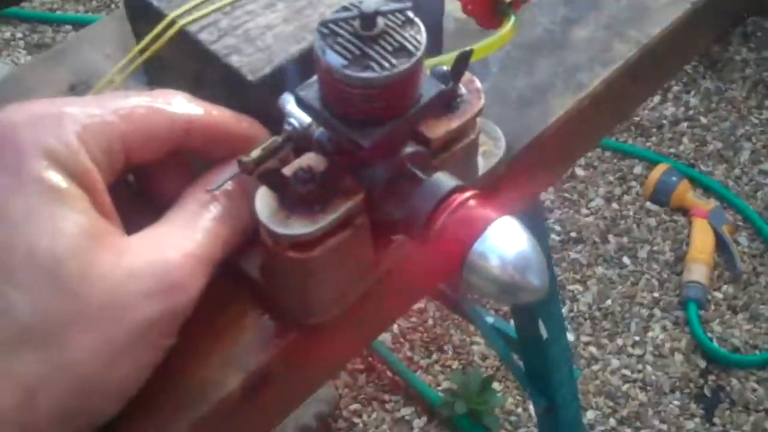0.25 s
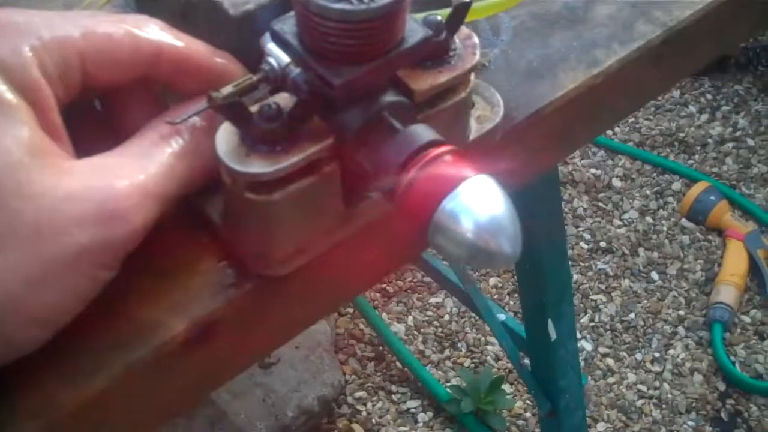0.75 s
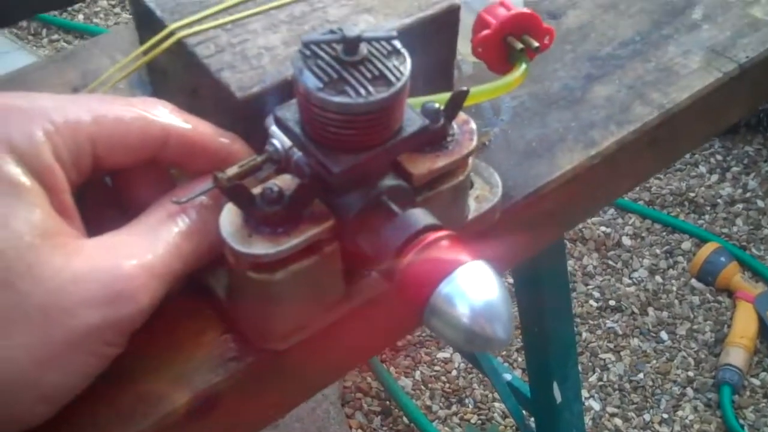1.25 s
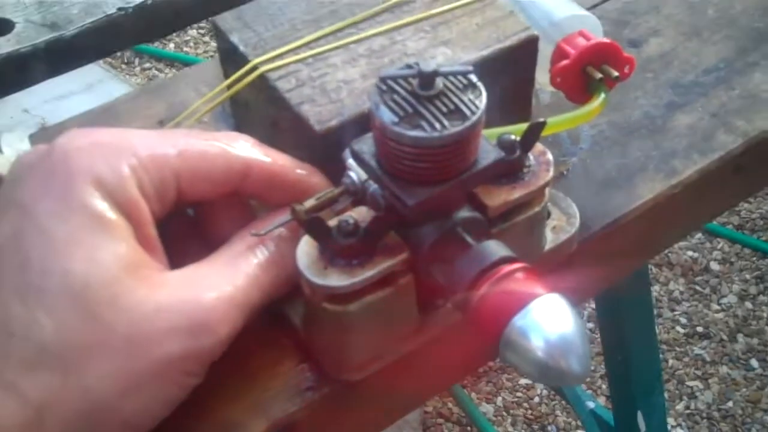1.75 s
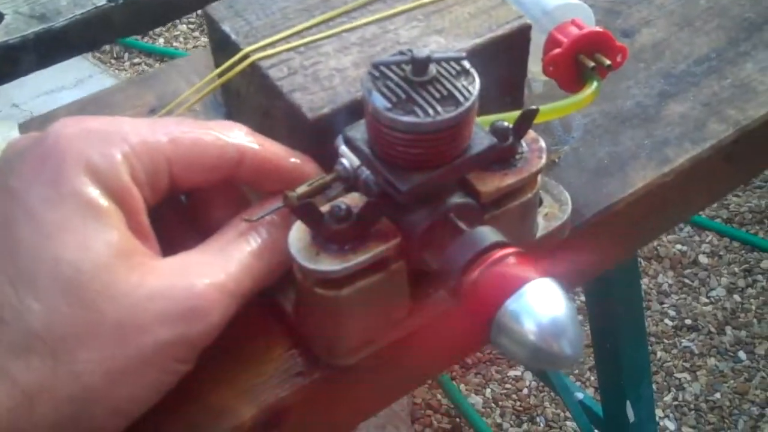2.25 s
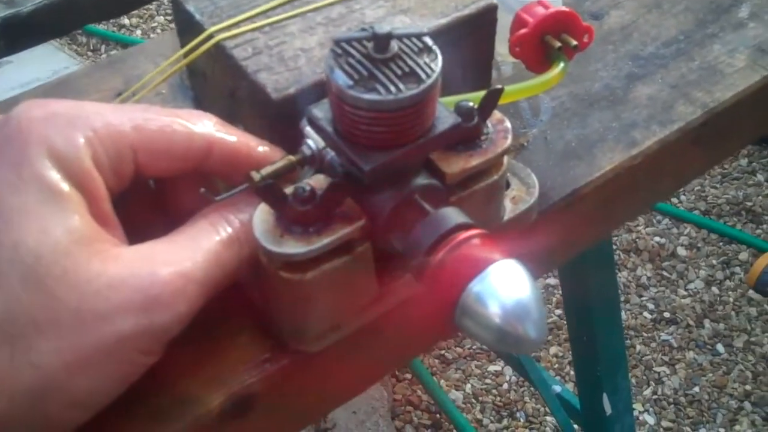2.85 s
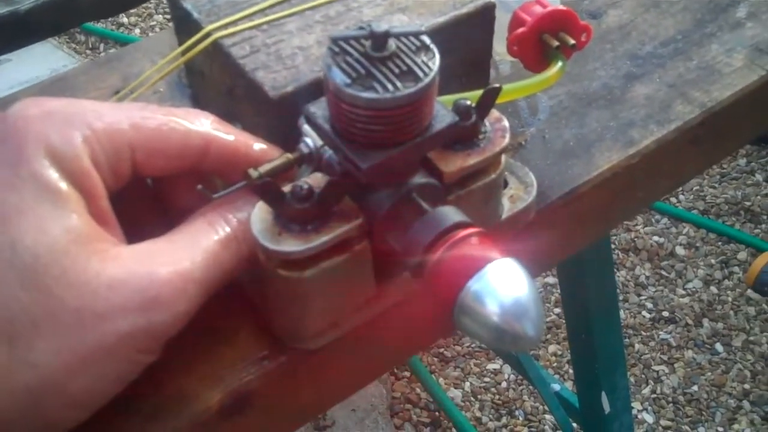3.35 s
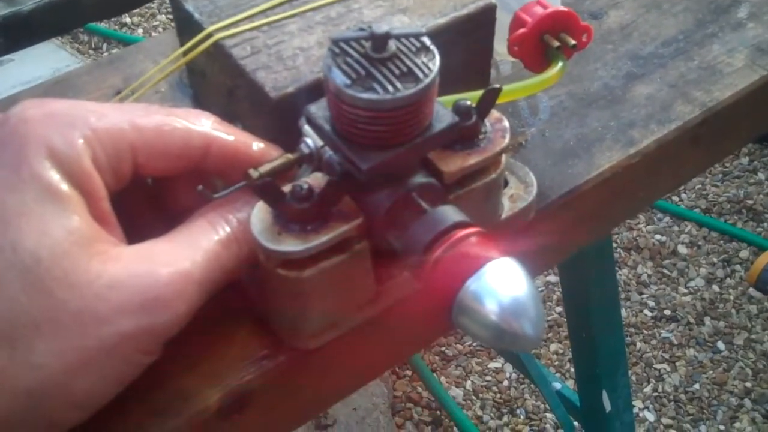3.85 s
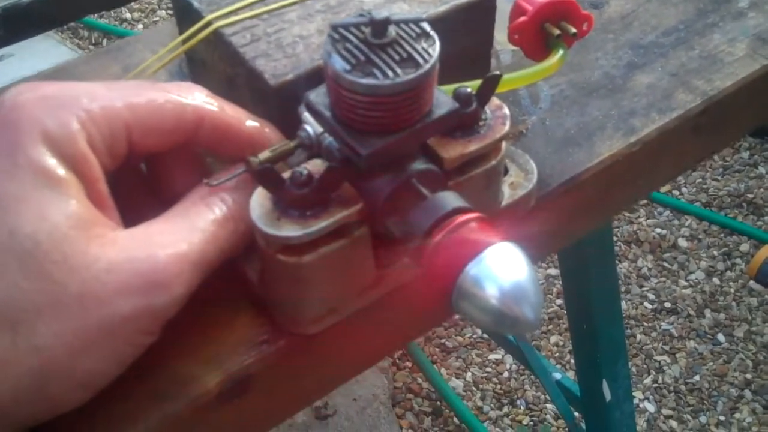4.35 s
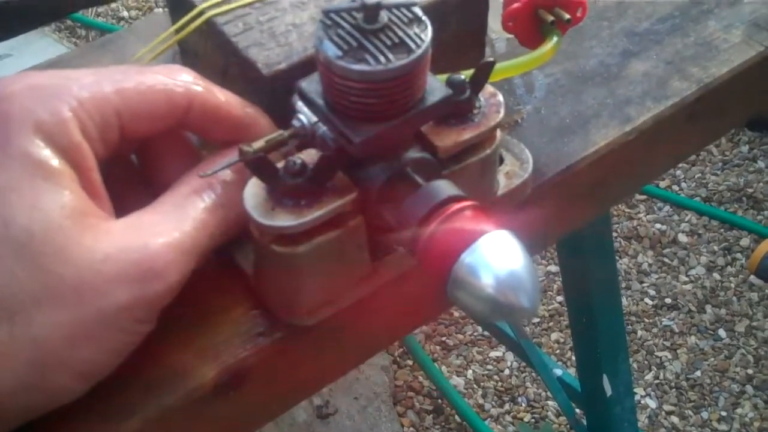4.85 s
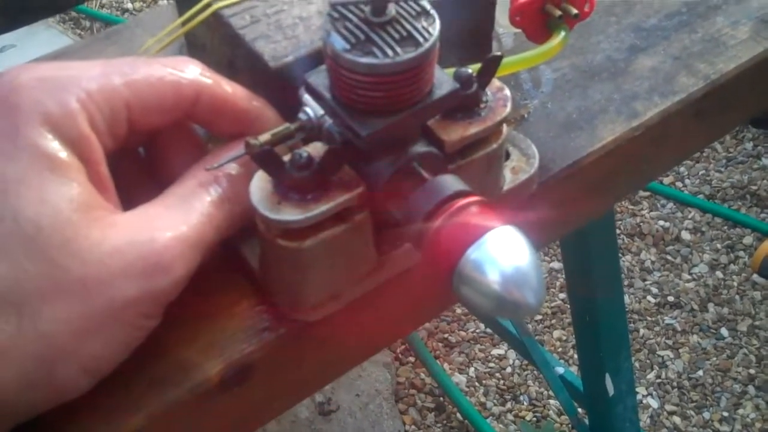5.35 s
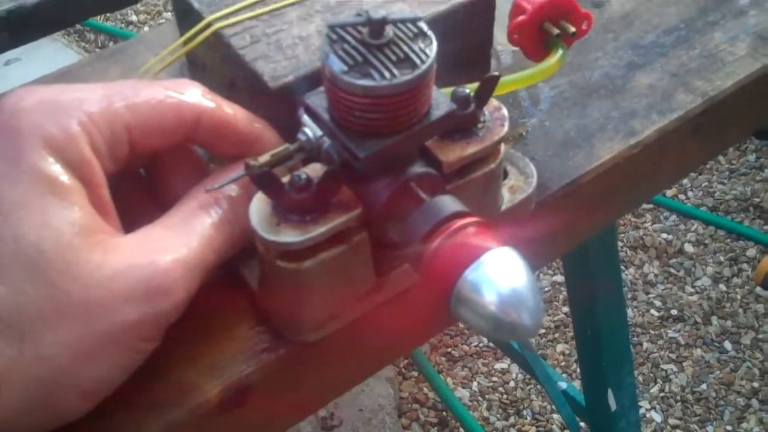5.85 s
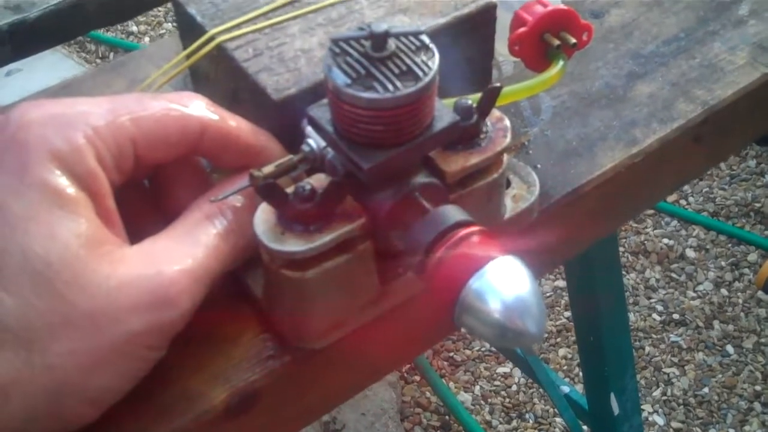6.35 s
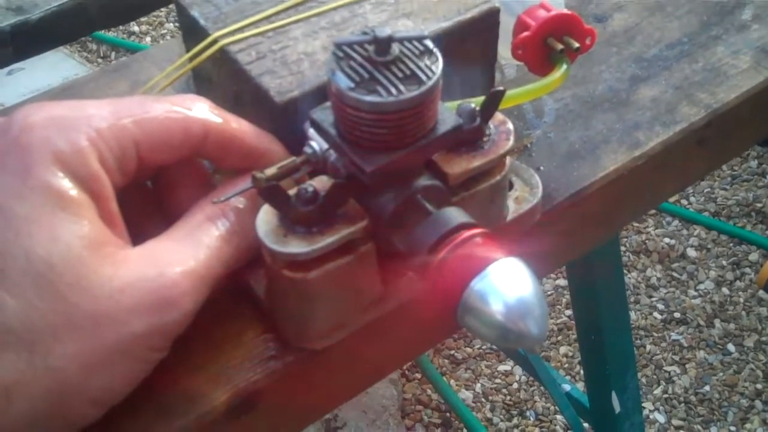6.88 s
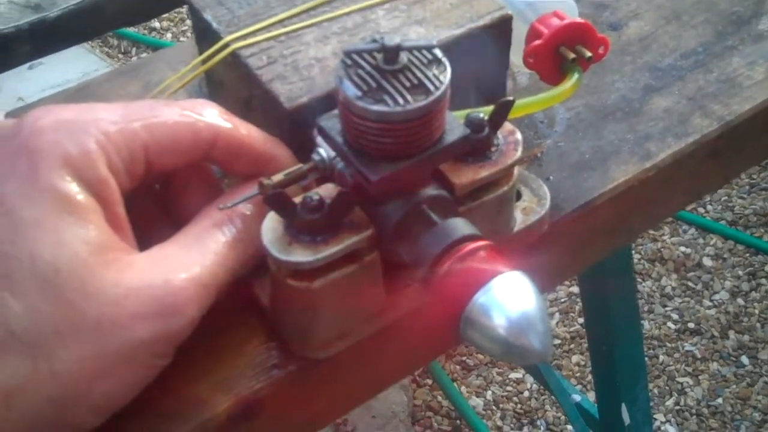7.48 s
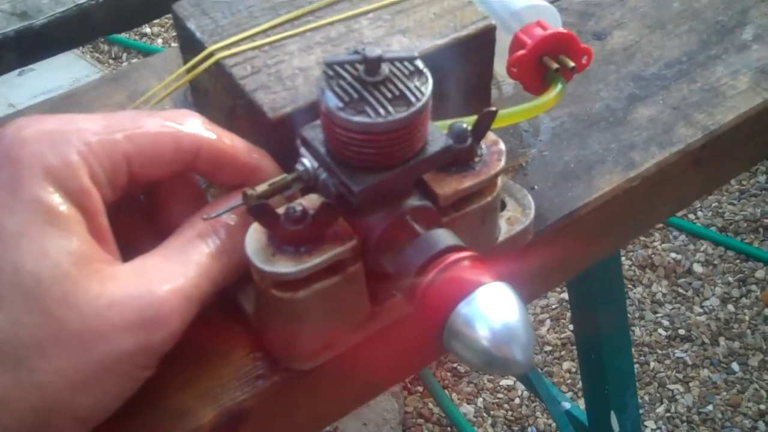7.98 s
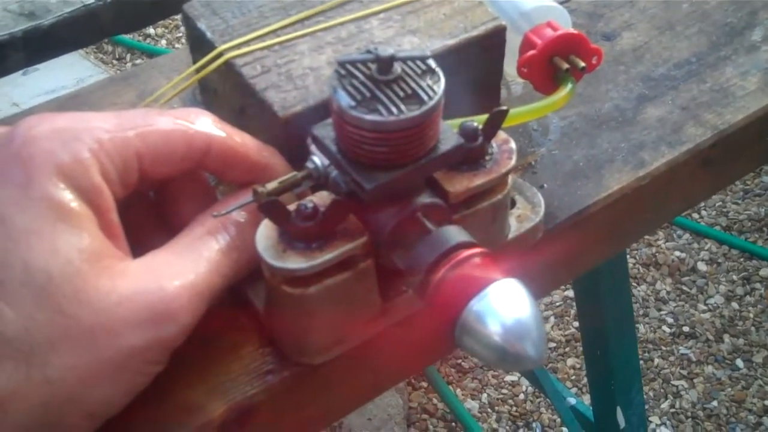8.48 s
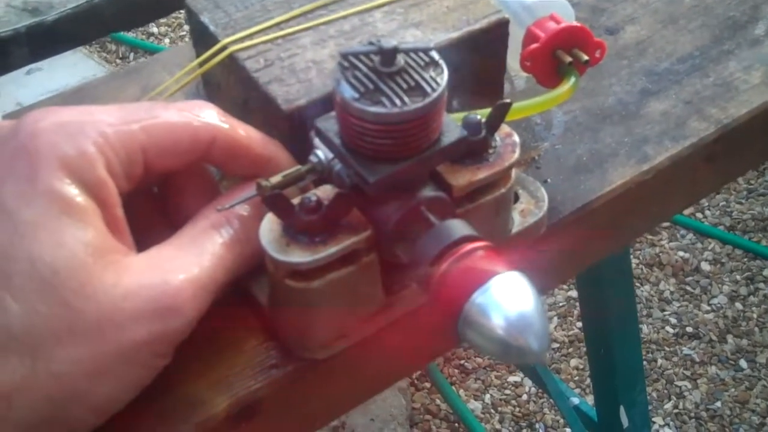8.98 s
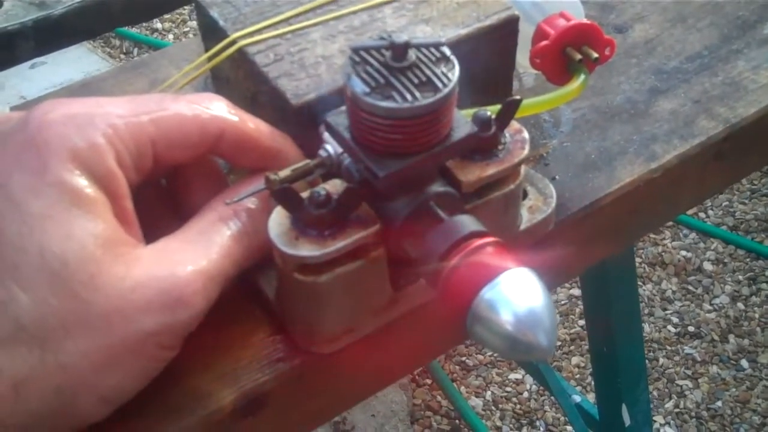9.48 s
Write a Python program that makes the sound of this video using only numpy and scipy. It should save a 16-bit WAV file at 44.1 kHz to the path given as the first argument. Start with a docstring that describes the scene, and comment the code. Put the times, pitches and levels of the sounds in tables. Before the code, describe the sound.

A tiny two-stroke engine spinning a propeller runs very close to a hand-held microphone in a garden. Its hard, raspy buzz climbs over several seconds, with metallic ringing, hiss and blade hum. Near the middle it stops firing and drops in pitch, catches three times with clanking pops, then runs on slower, with brief hiccups and low thumps of blown air on the microphone.

```python
"""On a garden bench a small two-stroke model diesel swings a propeller close to a hand-held microphone.
As the needle is turned it speeds up, stops firing and slows sharply, catches three times and runs on slower.
Each turn the exhaust port barks, made of short shaped pulses, and knocks ring the metal.
Shaped noise makes the gas hiss, sine waves make the blades hum, and deep thumps buffet the microphone."""
import sys
import numpy as np
from scipy import signal
from scipy.fft import rfft, irfft
from scipy.io import wavfile
from scipy.ndimage import uniform_filter1d, minimum_filter1d

SR = 44100
rng = np.random.default_rng(int(sys.argv[2]) if len(sys.argv) > 2 else 0)


def digitize_waveform(pressure):
    """Quantize a signal to 16-bit integers and store it at the path in sys.argv[1].

    Rows of a 2-D input are taken as channels; values are limited to [-1, 1].
    """
    field = np.atleast_2d(pressure).T
    bounded = np.clip(field, -1, 1)
    quanta = np.round(bounded * 32767).astype(np.int16)
    wavfile.write(sys.argv[1], SR, quanta)


N = 428652
TIME = np.arange(N) / SR
FRAME = 1024  # samples in one pulse
BINS_HZ = np.arange(FRAME // 2 + 1) * SR / FRAME
REFERENCE_HZ = 100  # shaft speed at which the speed laws are stated, turns per second


def undb(db):
    """Decibels to gain."""
    return 10 ** (np.asarray(db) / 20)


def curves(table, at):
    """Every column of a time table, read at the given times."""
    s, *columns = np.transpose(table)
    return [np.interp(at, s, c) for c in columns]


def spectra(table, hz):
    """Every column of a spectrum table, read on a log-frequency axis."""
    points, *columns = np.transpose(table)
    return [np.interp(np.log(hz + 1), np.log(points), c) for c in columns]


def bump(centre_hz, width_hz):
    """A bell shape on the frequency axis."""
    return np.exp(-((BINS_HZ - centre_hz) / width_hz) ** 2)


def by_speed(law, hz):
    """Level in dB at a given shaft speed; a law is (dB at the reference speed, dB per doubling of speed)."""
    db, db_per_doubling = law
    return db + db_per_doubling * np.log2(hz / REFERENCE_HZ)


def noise(table):
    """Steady noise with a given spectrum."""
    hz = np.arange(N // 2 + 1) * SR / N
    return irfft(rfft(rng.standard_normal(N)) * undb(spectra(table, hz)[0]), N)


def wander(count, size=12):
    """A random value for each step that drifts over several steps; spread near 1."""
    return np.sqrt(size) * uniform_filter1d(rng.standard_normal(count), size)


def scatter(times, spread_db):
    """A smooth random colouring for each turn."""
    chance = rng.standard_normal((len(times), len(BINS_HZ)))
    smooth = uniform_filter1d(uniform_filter1d(chance, size=15, axis=1), size=15, axis=1)
    return spread_db * smooth / smooth.std()


SWEEP_HZ = 1970  # in a swept pulse the sound below this arrives late
SMEAR_HZ = 4290  # in a smeared pulse the sound above this trails behind


def pulses(times, sizes, colour_db, abrupt=1, sweep_s=0, smear_s=0):
    """A pulse at each time with a shared or own spectrum; abrupt 1 strikes at once, 0 swells and fades evenly."""
    lead = FRAME // 8  # samples of room for a swell before the given time
    log_gain = np.log(undb(colour_db))
    # folding the cepstrum gives the phase of a pulse that strikes at once
    fold = 1 + np.sign(FRAME // 2 - np.arange(FRAME))
    phase = rfft(irfft(log_gain) * fold).imag * min(abrupt, 1)
    # sweep: the treble leads and the lows follow
    phase = phase - 2 * np.pi * sweep_s * SWEEP_HZ * np.arctan(BINS_HZ / SWEEP_HZ)
    # smear: the highest treble comes last
    phase = phase - np.pi * smear_s * np.maximum(BINS_HZ - SMEAR_HZ, 0) ** 2 / SMEAR_HZ
    start, late = np.divmod(np.clip(times * SR, 0, N), 1)
    phase = phase - 2 * np.pi * BINS_HZ * (lead + late[:, None]) / SR
    shapes = sizes[:, None] * irfft(np.exp(log_gain + 1j * phase))
    places = start.astype(int)[:, None] + np.arange(FRAME)
    return np.bincount(places.ravel(), shapes.ravel(), N + lead)[lead:N + lead]


# spells of poor firing: from t/s, to t/s, share of the charge burnt (0-1)
MISSES = [(0.736, 0.748, 0.2), (5.015, 5.221, 0.0), (5.415, 5.519, 0.0), (5.519, 5.53, 0.55),
          (5.615, 5.706, 0.0), (6.024, 6.07, 0.16), (6.11, 6.139, 0.16), (6.465, 6.489, 0.38),
          (6.796, 6.819, 0.4), (6.99, 7.02, 0.36), (7.06, 7.072, 0.25), (7.364, 7.41, 0.67),
          (7.811, 7.834, 0.42), (8.226, 8.238, 0.37), (8.693, 8.727, 0.38), (8.865, 8.888, 0.5),
          (9.005, 9.017, 0.12), (9.092, 9.104, 0.06), (9.494, 9.517, 0.43), (9.69, 9.72, 0.22)]


def firing(times):
    """Share of the charge that burns at each time, and how long the engine has been missing."""
    burn, missing_s = np.ones(len(times)), np.zeros(len(times))
    for start, end, share in MISSES:
        inside = (times >= start) & (times < end)
        burn[inside], missing_s[inside] = share, times[inside] - start
    return burn, missing_s


# speed that the needle setting would hold if every turn fired: t/s, turns per second f/Hz
NEEDLE_SPEED = [(0.0, 96.53), (0.17, 97.09), (0.63, 104.23), (0.92, 103.07), (1.88, 114.49), (2.08, 110.21),
                (2.52, 118.27), (2.93, 119.34), (3.42, 129.95), (4.42, 130.55), (4.87, 116.34),
                (5.23, 99.38), (6.16, 95.33), (6.2, 90.43), (7.22, 87.51), (8.44, 92.51), (8.53, 97.26),
                (9.72, 90.95)]


def shaft_speed(inertia_s=.164, misfire_drag=.37):
    """The shaft lags behind the needle, coasts down on every misfire and picks up when it fires again."""
    # an unburnt charge takes its share off the speed that the shaft heads for
    aim = curves(NEEDLE_SPEED, TIME)[0] * (1 - misfire_drag * (1 - firing(TIME)[0]))
    keep = np.exp(-1 / (inertia_s * SR))
    return aim[0] + signal.lfilter([1 - keep], [1, -keep], aim - aim[0])


def combustion(times, linger=0.85, flare_db=7):
    """Burn, time spent missing and flare of each turn: fuel left unburnt makes the next firings louder."""
    burn, missing_s = firing(times)
    linger = min(linger, .95)
    unburnt = signal.lfilter([0, 1 - linger], [1, -linger], 1 - burn)
    return burn, missing_s, flare_db * unburnt ** 2 * (burn == 1)


BLADE_LAW = (-26.5, 8.8)
THROB_LAW = (-54, 48)  # unequal blades throb once a turn near full speed
# octave above the blade hum, weaker at high speed: turns per second f/Hz, level relative to the hum/dB
HUM_OCTAVE = [(85, -9.5), (100, -9.5), (113, -15.5), (122, -21), (130, -19)]


def propeller(turns, speed, third_db=-20, angle=0.12, second_angle=0.088):
    """Two blades push the air twice a turn: a round hum with two overtones, over a faint once-a-turn throb."""
    blade = 4 * np.pi * (turns - angle)
    octave = undb(curves(HUM_OCTAVE, speed)[0]) * np.sin(2 * (blade + 2 * np.pi * second_angle))
    third = undb(third_db) * np.sin(3 * blade)
    hum = undb(by_speed(BLADE_LAW, speed)) * (octave + third - np.cos(blade))
    throb = undb(by_speed(THROB_LAW, speed)) * np.sin(blade / 2)
    return np.sqrt(2) * (hum + throb)


HISS_LAW = (9.34, -0.15)
# colour of the rush of gas and air: f/Hz, relative level/dB
RUSH_COLOUR = [(60, -18.5), (300, -29), (800, -33), (1400, -29.5), (2400, -24.5), (4100, -31.5),
               (5200, -27.5), (7400, -28.5), (9000, -38), (11500, -48.5), (14500, -52)]


def hiss(turns, level_db, burn, suck=0.74, intake_at=0.43, intake_turns=0.039, idle=0.33, alike_hz=3500):
    """Gas rushes out after each bark and is drawn in later in the turn, over the steady wash of the blades."""
    hz = np.arange(N // 2 + 1) * SR / N
    colour = undb(spectra(RUSH_COLOUR, hz)[0])
    # the two sides are more alike in the lows
    apart = np.clip(hz / alike_hz, .4, 1)
    mid, side = (irfft(rfft(rng.standard_normal(N)) * colour * g, N) for g in (1, apart))
    angle = turns % 1
    jet = burn * np.exp(-angle / .2)  # fades over a fifth of a turn
    draw = suck * np.exp(-((angle - intake_at) / intake_turns) ** 2)
    return np.array([mid + side, mid - side]) * (idle + jet + draw) * undb(level_db) / np.sqrt(2)


WHISTLE_LAW = (-0.86, -2.9)
EARLY_WHISTLE_DB, EARLY_WHISTLE_S = 7, 0.67  # at first the whistle is louder: extra level, fade
# whistles as the piston uncovers the intake: f/Hz, width f/Hz, relative level/dB, fade t/s
INTAKE_WHISTLES = [(6340, 550, -29.5, 0.0012), (7430, 710, -32, 0.0033)]


def intake(turns, speed, opens=.42, attack_s=0.00041, rise_s=0.00049, bend=0.27, rough=1.0):
    """The whistle bends up as the port opens, then fades within the turn: part pure tone, part turbulence."""
    angle = (turns - opens) % 1
    age = angle / speed
    out = np.zeros((2, N))
    for hz, width_hz, db, fade_s in INTAKE_WHISTLES:
        keep = np.exp(-np.pi * width_hz / SR)
        chance = rng.standard_normal((2, N)) + 1j * rng.standard_normal((2, N))
        flutter = signal.lfilter([np.sqrt((1 - keep ** 2) / 2)], [1, -keep], chance)
        cycles = hz * (age - bend * rise_s * (1 - np.exp(-age / rise_s)))
        envelope = undb(db) * (1 - np.exp(-age / attack_s)) * np.exp(-age / fade_s) * (1 - angle ** 2)
        out += envelope * ((1 + rough * flutter) * np.exp(2j * np.pi * cycles)).imag
    early_db = EARLY_WHISTLE_DB * np.exp(-TIME / EARLY_WHISTLE_S)
    return undb(by_speed(WHISTLE_LAW, speed) + early_db) * out


BARK_LAW = (0.037, 1.6)
SWELL_DB_PER_S = 9  # while it misses, the cylinder loads up with fuel and the dull puffs swell
# in the first turns of a rich miss the charge burns late and rings the hot port
LATE_HZ, LATE_WIDTH_HZ, LATE_DB, LATE_SHARE, COOLING_S = 2900, 280, 12, 0.11, 0.024
# the transfer port's second puff ripples the spectrum: share of a turn later, depth of the ripple
TRANSFER_TURNS, TRANSFER_DB = 0.127, 2
# the needle takes the mixture from lean to rich: t/s, richness (0-1)
RICHNESS = [(5.0, 0), (5.2, 1)]
# colour of a fired bark: f/Hz, relative level when rich/dB, when lean/dB, when lean at full speed/dB
BARK_COLOUR = [(86, -9.5, -19, -20), (408, 6.5, 13, 18.5), (693.6, 9.5, 7, 6.5), (1099, 15.5, 14, 11),
               (1340, 10.5, 14, 0.5), (1610, 12.5, 16, 12.5), (1946, 13.5, 8.5, 5.5),
               (2407, 19.5, 21, 18.5), (3070, 9.5, 6.5, 9), (3290, 3.5, 3.5, 10), (4264, 2, 2, 5),
               (4760, 8.5, 6.5, -5), (5200, -1, 0, 8), (5700, 6.5, 2.5, 5.5), (7160, -2.5, 2.5, -17),
               (9500, -12.5, -10.5, -8), (14500, -15, -13, -12)]
# gaps and humps in the bark: multiple of shaft speed when lean, when rich, width f/Hz,
# gain when lean level/dB, gain when rich level/dB
BARK_GAPS = [(14.5, 15.4, 204, -21, -15.5), (7.9, 1.86, 290, -1, 8), (20.6, 19, 280, 1, -3.5)]
# colour of the dull puff of an unfired turn: f/Hz, relative level/dB
PUFF_COLOUR = [(87, 1.5), (400, 11.5), (650, 8), (880, 0.5), (1120, 3.5), (1600, -1.5), (1950, -2.5),
               (2450, 12), (2950, 3.5), (3500, -11), (4600, -7), (7500, -5), (14500, -39)]


def exhaust(times, hz, burn, missing_s, flare_db, slow_hz=110, fast_hz=128, treble_db=2,
            flare_share=0.71, lag_s=.00002):
    """The port opens once a turn: a short bark, recoloured by speed and mixture, or a dull puff if unburnt."""
    lean_spread_db, rich_spread_db = .3, .4
    richness = curves(RICHNESS, times)[0][:, None]
    rich, lean, fast = spectra(BARK_COLOUR, BINS_HZ)
    pace = np.clip((hz - slow_hz) / (fast_hz - slow_hz), 0, 1)[:, None]
    fired = richness * rich + (1 - richness) * (lean + pace * (fast - lean))
    # the blow-down lasts a fixed crank angle, so its spectral gaps rise with speed
    for lean_order, rich_order, width_hz, lean_db, rich_db in BARK_GAPS:
        centre_hz = hz[:, None] * (lean_order + richness * (rich_order - lean_order))
        fired = fired + (lean_db + richness * (rich_db - lean_db)) * bump(centre_hz, width_hz)
    late = richness * np.exp(-missing_s[:, None] / COOLING_S)
    unfired = spectra(PUFF_COLOUR, BINS_HZ)[0] + SWELL_DB_PER_S * missing_s[:, None]
    unfired = unfired + LATE_DB * late * bump(LATE_HZ, LATE_WIDTH_HZ)
    unfired = unfired + TRANSFER_DB * np.cos(2 * np.pi * TRANSFER_TURNS * BINS_HZ / hz[:, None])
    burnt = burn[:, None] + (1 - burn[:, None]) * LATE_SHARE * late
    spread_db = lean_spread_db + richness * (rich_spread_db - lean_spread_db)
    bark = unfired + burnt * (fired - unfired) + scatter(times, spread_db)
    uneven_db = spread_db[:, 0] * rng.standard_normal(len(times))
    sizes = undb(by_speed(BARK_LAW, hz) + flare_share * flare_db + uneven_db)
    # the jet throws its treble differently to each side
    treble = np.clip(BINS_HZ / 4500, 0, 1) ** 2
    sides = []
    for lag in (lag_s, 0):
        colour_db = bark + treble * scatter(times, treble_db)
        # sweep: the port hisses as it cracks open, before the bulk of the gas gets out
        sides.append(pulses(times + lag, sizes, colour_db, abrupt=0.71, sweep_s=.00095, smear_s=.00055))
    return np.array(sides)


# modes of the engine mount and bench: f/Hz, sharpness Q, level/dB
MOUNT_MODES = [(607, 5, -6), (794, 6.7, -13), (1005, 11.8, -2.5), (1906, 35, -5)]


def mount(x):
    """The barks shake the mount, whose few modes ring on into the gaps between firings."""
    return sum(undb(db) * signal.lfilter(*signal.iirpeak(hz, q, fs=SR), x) for hz, q, db in MOUNT_MODES)


BUFFET_WANDER_DB = 2  # the blast veers on and off the microphone
# how squarely the blast meets the microphone: t/s, relative level/dB
BLAST_AIM = [(0, -4), (1.2, -1.5), (2.3, 1), (3.3, -1), (4.3, 2.5), (5.3, -1), (6.4, -2.5), (7.7, -5.5),
             (9.7, -3)]
# colour of the blast's eddies on one microphone port: f/Hz, relative level/dB
EDDY_COLOUR = [(10, 21), (35, 22.5), (80, 17.5), (160, 12.5), (350, 6.5), (900, -18), (3000, -9),
               (9000, -39)]
# colour of the steady shove of each blast: f/Hz, relative level/dB
PUSH_COLOUR = [(20, 31), (110, 13), (400, 14.5), (900, -0.5), (1600, 9.5), (4000, -55), (12000, -33)]
# strongest gusts on the microphone: t/s, relative level/dB
STRONG_GUSTS = [(0.318, 0), (0.469, -6), (0.141, -13), (2.15, -5), (4.32, -7), (5.2395, -1.5), (5.564, -3),
                (5.724, -5), (5.963, -5), (6.078, -6.5), (6.399, -8), (6.455, -5), (6.499, -2.5),
                (7.039, -4), (7.837, -8), (8.9, -8), (8.967, -12), (9.124, -10), (9.28, -10), (9.409, -9),
                (9.535, -7)]
# colour of the thump of one gust: f/Hz, relative level/dB
GUST_COLOUR = [(10, 16.5), (40, 20), (80, 8.5), (160, 11.5), (350, -2.5), (900, -38), (3000, -53),
               (9000, -60)]


def buffeting(times, force, gusty_db=3.4, travel_s=0.0012, push_db=0, eddy_db=-2, gust_db=21):
    """Each blast pushes the two microphone ports opposite ways, then its eddies thump each port alone."""
    level_db = curves(BLAST_AIM, times)[0] + BUFFET_WANDER_DB * wander(len(times))
    shove = force * undb(push_db + level_db)
    push = pulses(times + travel_s / 2, shove, spectra(PUSH_COLOUR, BINS_HZ)[0], abrupt=0.99)
    left, right, gusty = rng.standard_normal((len(times), 3)).T
    eddy = force * undb(level_db + eddy_db + gusty_db * gusty)
    eddy_colour_db = spectra(EDDY_COLOUR, BINS_HZ)[0]
    eddies = [pulses(times + travel_s, eddy * chance, eddy_colour_db) for chance in (left, right)]
    at, peak_db = np.transpose(STRONG_GUSTS)
    gusts = pulses(at, undb(peak_db + gust_db), spectra(GUST_COLOUR, BINS_HZ)[0])
    return np.array(eddies) + np.array([gusts / 2 - push, gusts + push])


RING_LAW = (-4.7, 21.4)
UNFIRED_KNOCK_DB = -4  # the piston knocks more softly when nothing burns
# at first a thin, bright ring rides on the knocks; its pitch is a multiple of the shaft speed
SHRILL_ORDER, SHRILL_WIDTH_HZ, SHRILL_DB, SHRILL_FADE_S = 64.5, 520, 11.5, 1.2
# ring of the cylinder and its fins: f/Hz, width f/Hz, relative level/dB
FIN_RINGS = [(2700, 5900, -9), (4540, 300, -27), (5890, 1900, -5.5), (6540, 660, -1), (7360, 500, 0),
             (8900, 660, -15), (13000, 2700, -27)]
# knocks of piston and crank: share of a turn after the port opens, relative level/dB, tilt dB per octave
KNOCK_ANGLES = [(0.169, -11.5, -2), (0.393, -2.5, 0.5), (0.556, -14, -5), (0.696, -27, -9),
                (0.878, -8, -7.5)]
# how the ring changes: t/s, gain near 4.9 kHz level/dB, relative level of the knocks/dB
RING_CHANGES = [(0, -6, 11.5), (.65, 0, 6.5), (1.4, 2.5, 6.5), (2.5, 2.5, 9)]


def metal(times, hz, burn, uneven_db=-0.5, slack_s=.000008, lag_s=.00003):
    """Piston and crank take up their play at fixed angles and ring the cylinder."""
    level_db = by_speed(RING_LAW, hz) + curves(RING_CHANGES, times)[1] + UNFIRED_KNOCK_DB * (1 - burn)
    power = sum(undb(2 * db) / (1 + (2 * (BINS_HZ - f) / width) ** 2) ** 2.06 for f, width, db in FIN_RINGS)
    octaves = np.log2(np.clip(BINS_HZ / 6000, .4, 1.4))
    shrill_db = SHRILL_DB * np.exp(-times[:, None] / SHRILL_FADE_S)
    shrill_db = shrill_db * bump(SHRILL_ORDER * hz[:, None], SHRILL_WIDTH_HZ)
    out = np.zeros((2, N))
    for angle, db, tilt_db in KNOCK_ANGLES:
        early, size = rng.standard_normal((len(times), 2)).T
        at = times + angle / hz + slack_s * early
        sizes = undb(level_db + db + uneven_db * size)
        ring_db = 10 * np.log10(power) + tilt_db * octaves + shrill_db
        out += [pulses(at + lag, sizes, ring_db, abrupt=0.24, smear_s=0.001045) for lag in (0, lag_s)]
    return out


def fill_out(engine):
    """The engine's treble near 4.9 kHz starts thin, then fills out: one filtered band is mixed in."""
    upper_ring = signal.lfilter(*signal.iirpeak(4900, 4, fs=SR), engine)
    return engine + (undb(curves(RING_CHANGES, TIME)[0]) - 1) * upper_ring


# colour of gas still burning as it leaves the port: f/Hz, relative level/dB
ROAR_COLOUR = [(100, -15), (650, -11), (1000, 3), (1400, -3), (1800, 5), (2400, -14), (3100, 13),
               (4100, -1), (5200, -7), (8000, -5.5), (14500, -34)]


def afterburn(times, flare_db, level_db=-7, peak_s=0.001, length_s=0.00097):
    """Fuel left from a miss burns on in the port and thickens the next pops with a short roar."""
    turn = np.maximum(np.searchsorted(times, TIME) - 1, 0)
    burst = np.exp(-((TIME - times[turn] - peak_s) / length_s) ** 2)
    return undb(level_db) * np.sqrt(flare_db[turn] / flare_db.max()) * burst * noise(ROAR_COLOUR)


# a flooded cylinder fires too early as it catches: t/s, relative level/dB
EARLY_FIRINGS = [(5.2365, 2.5), (5.547, -3.5), (5.721, -1.5)]
# colour of the clank of an early firing: f/Hz, relative level/dB
CLANK_COLOUR = [(100, -7), (600, 9), (1500, -1), (3300, -6), (4100, -3), (5100, 1.5), (6000, -9),
                (7500, -8), (9000, -20), (14500, -42)]


def detonations(level_db=2, attack_s=0.00063, fade_s=0.0019):
    """Each early firing is a short, gritty metallic clank: a burst of shaped noise."""
    envelope = np.zeros(N)
    for at, db in EARLY_FIRINGS:
        age = np.maximum(TIME - at, 0)
        envelope += undb(level_db + db) * (1 - np.exp(-age / attack_s)) * np.exp(-age / fade_s)
    return envelope * noise(CLANK_COLOUR)


# echoes from bench, hand and ground: delay to the left t/s, delay to the right t/s, level/dB
NEAR_ECHOES = [(.00165, 0.0017, -19), (.0031, 0.0015, -26), (.0056, 0.0063, -40)]


def garden(x, wet_db=-8, thin_hz=3500, dull_hz=3200, t60_s=.07):
    """Near surfaces give a few dull echoes; bench and gravel scatter the treble into a very short tail."""
    t = TIME[:SR // 4]
    tail = rng.standard_normal((2, len(t))) * np.exp(-np.log(1000) * t / t60_s) * (t > .001)
    tail = tail / np.sqrt(np.sum(tail ** 2, axis=1, keepdims=True))
    thin = signal.butter(1, thin_hz, "high", fs=SR, output="sos")
    response = undb(wet_db) * signal.sosfilt(thin, tail)
    echoes = sum(undb(db) * np.sinc((t - np.array([[left], [right]])) * SR) for left, right, db in NEAR_ECHOES)
    response = response + signal.sosfiltfilt(signal.butter(2, dull_hz, fs=SR, output="sos"), echoes)
    return x + signal.fftconvolve(x, response, axes=1)[:, :N]


HUNT_TURNS = .0025  # on a rich mixture the shaft hunts about its mean position by roughly this
# the hand-held microphone drifts: t/s, left minus right level/dB
HAND_DRIFT = [(0, -1.1), (4.4, -0.5), (5.4, -0.3), (9.7, -1.55)]


def scene(left_blast_db=1.0, unfired_hiss_db=-3, port_opens=.38):
    """The crank angle times the engine's sources, and the shaft speed sets their levels."""
    wobble_s, shaky_s = .000007, .000012
    speed = shaft_speed()
    drifting = uniform_filter1d(wander(N, size=3000), size=1000)
    hunting = HUNT_TURNS * curves(RICHNESS, TIME)[0] * drifting
    turns = np.cumsum(speed) / SR - port_opens + hunting
    # the exhaust port opens at every whole turn
    times = np.interp(np.arange(int(turns[-1]) + 1), turns, TIME)
    hz = np.interp(times, TIME, speed)
    burn, missing_s, flare_db = combustion(times)
    # the flywheel evens out the firing better at speed; unfired turns coast smoothly
    jitter_s = np.interp(hz, [88, 125], [shaky_s, wobble_s])
    times = times + burn * jitter_s * rng.standard_normal(len(times))
    force = burn ** 2 * undb(flare_db)
    flow, unfired = np.interp(TIME, times, force), np.interp(TIME, times, 1 - burn)
    barks = exhaust(times, hz, burn, missing_s, flare_db)
    engine = hiss(turns, by_speed(HISS_LAW, speed) + unfired_hiss_db * unfired, flow)
    engine = engine + intake(turns, speed) + barks + mount(barks)
    engine = engine + metal(times, hz, burn) + afterburn(times, flare_db) + detonations()
    drift = undb([curves(HAND_DRIFT, TIME)[0], np.zeros(N)])
    airborne = (garden(fill_out(engine)) + propeller(turns, speed)) * drift
    return airborne + buffeting(times, burn ** 2) * undb([[left_blast_db], [0]])


QUIET_DB, RELEASE_DB_PER_S = -5, 43  # peak level below which the gain rises, and how fast
LOOK_AHEAD_S = .002


def gain_control(x, share=1.0):
    """The gain rises while the peaks stay low and drops just ahead of the next loud peak."""
    released = RELEASE_DB_PER_S * TIME
    peak_db = 20 * np.log10(np.abs(x).max(axis=0) + 1e-9)
    # each peak is held, then let down at the release rate
    held_db = np.maximum.accumulate(peak_db + released) - released
    boost_db = share * np.maximum(QUIET_DB - np.maximum(held_db, QUIET_DB - released), 0)
    size = int(LOOK_AHEAD_S * SR)
    return x * undb(uniform_filter1d(minimum_filter1d(boost_db, size), size))


DIP_HZ, DIP_Q, DIP_DB = 4124, 8.7, -8.5  # the microphone has a narrow dip in the treble
TOP_HZ = 14400


def record(dry):
    """Dips a narrow treble band, drops the deepest rumble, rides the gain, clips and cuts the top."""
    x = dry + (undb(DIP_DB) - 1) * signal.lfilter(*signal.iirpeak(DIP_HZ, DIP_Q, fs=SR), dry)
    x = gain_control(signal.sosfilt(signal.butter(2, 22, "high", fs=SR, output="sos"), x))
    return signal.sosfilt(signal.ellip(8, .2, 70, TOP_HZ, fs=SR, output="sos"), np.clip(x, -1, 1))


dry = scene()
out = record(dry)
digitize_waveform(out)
```